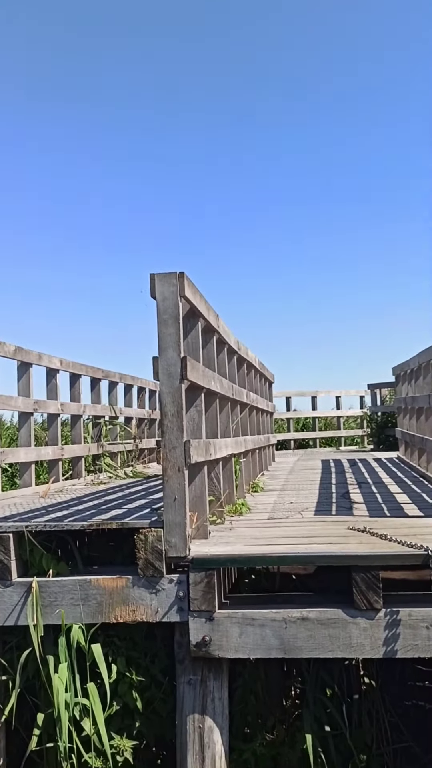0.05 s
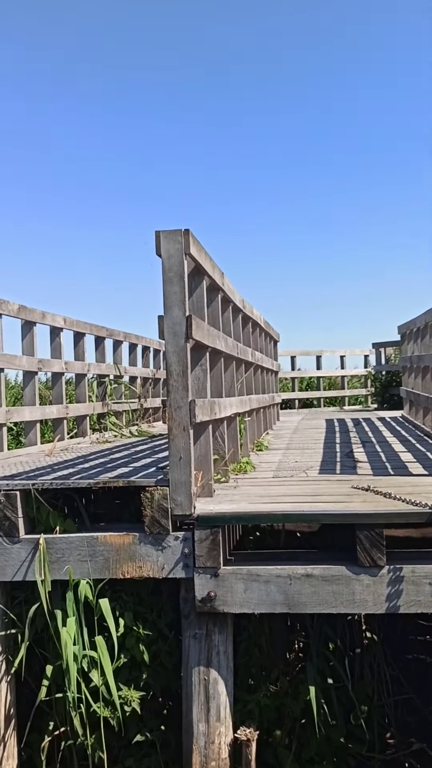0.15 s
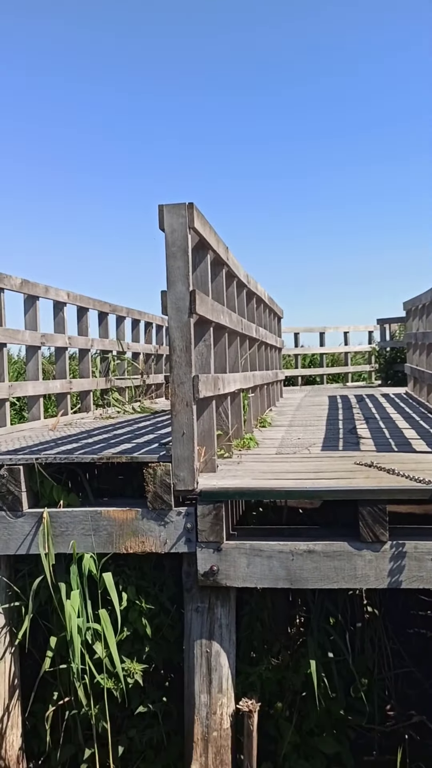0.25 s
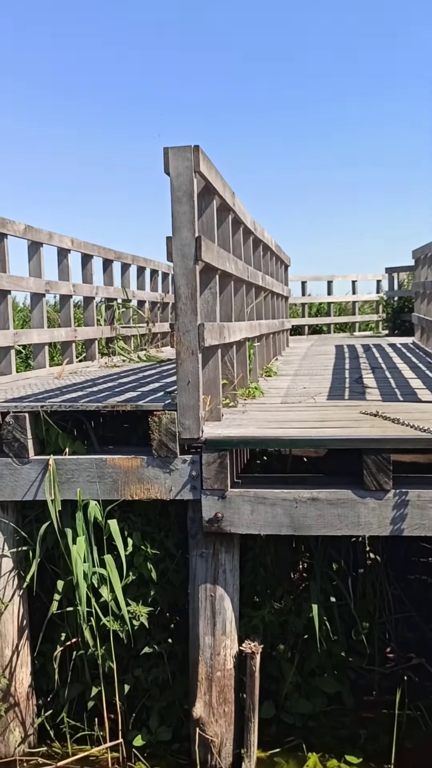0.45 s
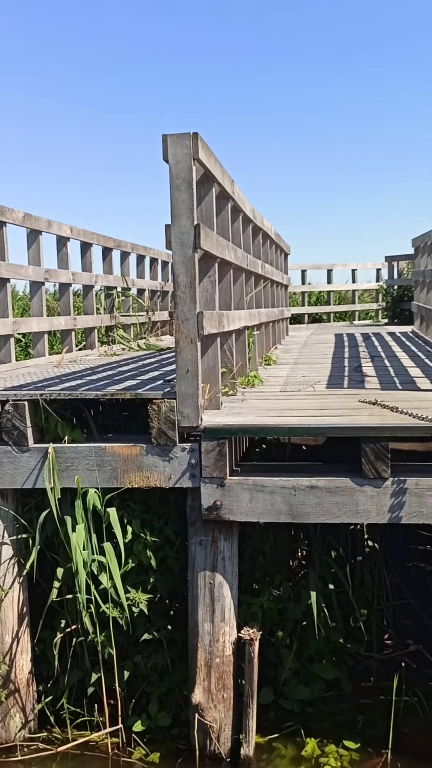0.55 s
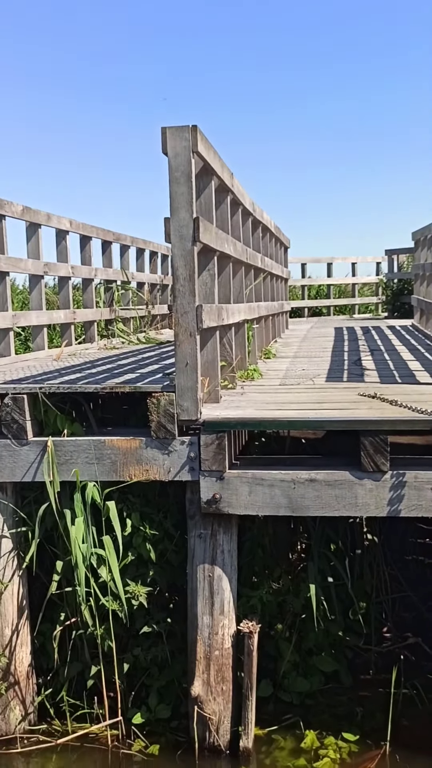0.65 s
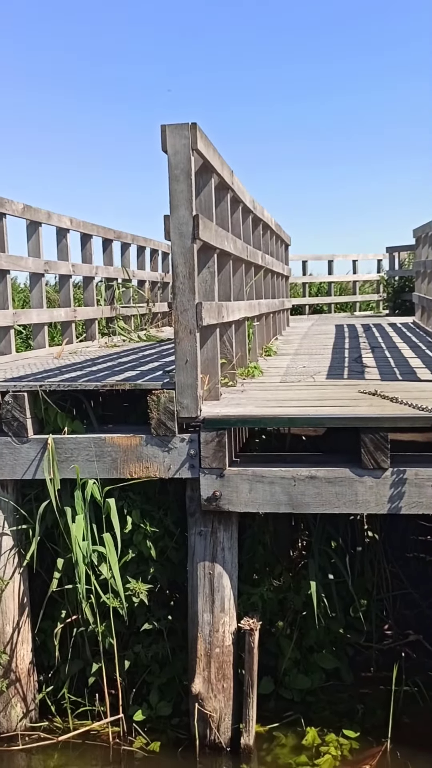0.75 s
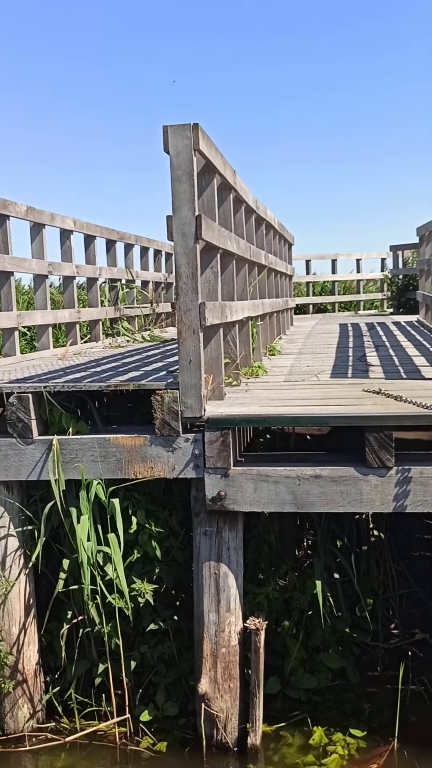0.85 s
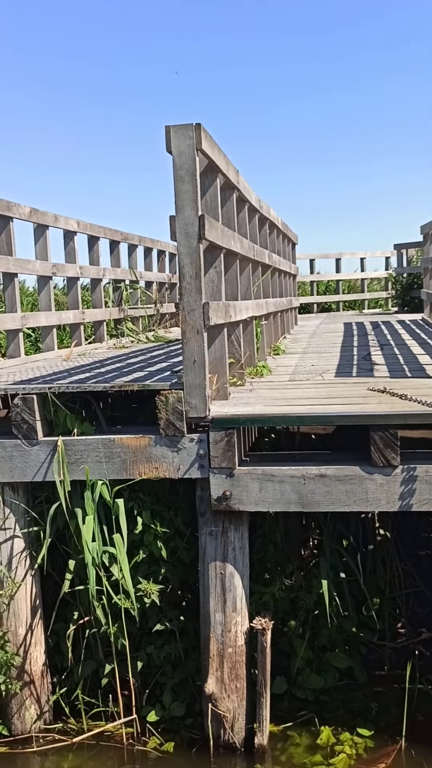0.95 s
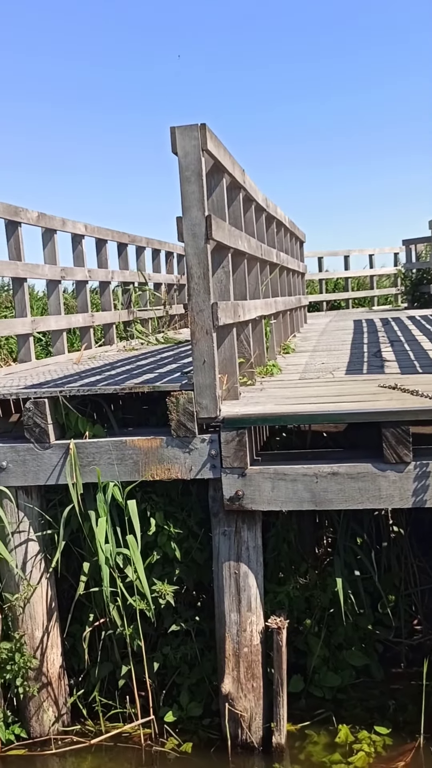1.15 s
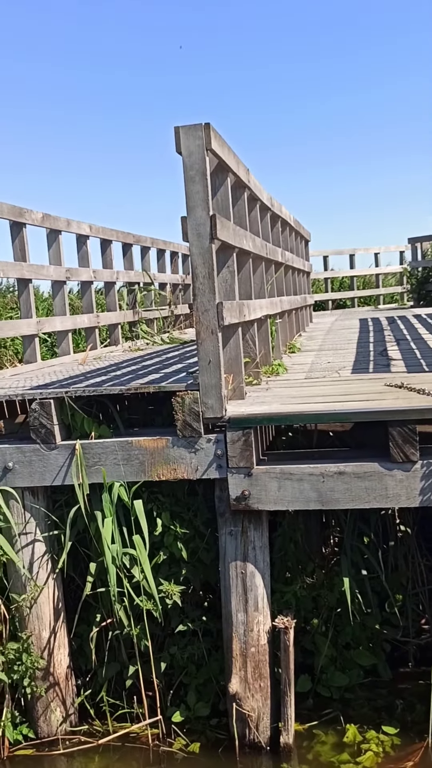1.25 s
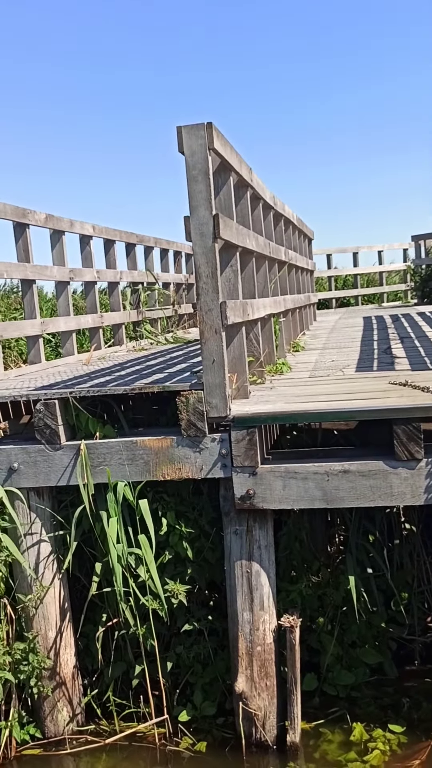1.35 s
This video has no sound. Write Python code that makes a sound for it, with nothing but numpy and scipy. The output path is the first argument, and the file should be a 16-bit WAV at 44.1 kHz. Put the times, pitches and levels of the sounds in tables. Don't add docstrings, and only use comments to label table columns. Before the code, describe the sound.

Chain links drop with a sharp metallic clank, followed by faint wooden knocks and small clicks

```python
import sys
import numpy as np
from scipy import signal
from scipy.fft import rfft, irfft, next_fast_len
from scipy.io import wavfile
from scipy.ndimage import uniform_filter1d, map_coordinates

SR = 44100
rng = np.random.default_rng(int(sys.argv[2]) if len(sys.argv) > 2 else 0)


def unload_audio(sound):
    columns = np.transpose(np.atleast_2d(sound))
    steps = np.round(np.clip(columns, -1, 1) * 32767)
    wavfile.write(sys.argv[1], SR, steps.astype(np.int16))


def attenuation_scalar(level_db):
    decades = np.asarray(level_db, float) / 20
    return 10 ** decades


N = 61739

# start in seconds, peak in dB, tilt in dB per octave.
CLANKS = [(.2122, -9, 9), (.2158, -15, -3), (.2288, -12, -0.5), (.2322, -6, 0.5), (.237, -19, -2),
          (.2425, -15.5, -2), (.2455, -16.5, 0), (.2495, -20, -4.5), (.2535, -30, -5.5),
          (.265, -24.5, -6.5), (.272, -34, -7)]
# pitch in Hz, level in dB.
CLANK_COLOUR = [(450, -21), (900, -18.5), (1600, -10.5), (2600, -10.5), (4100, 1.5), (7500, 4.5),
                (15600, -3.5), (15850, -35)]
# pitch in Hz, level in dB, time to fall 60 dB in seconds.
SHACKLE = [(1172, -14, 0.3), (1370, -25, 0.21), (1445, -5, 0.13), (1687, 0.5, 0.13), (1949, -11, 0.18),
           (2450, -5, .15), (2937, -4.5, 0.11), (3391, -3.5, 0.22), (3681, -2.5, 0.28), (3800, -15, .2),
           (3992, -1.5, 0.16), (4070, 2.5, 0.099), (4570, -10, 0.091), (4680, -13, 0.2)]
# pitch in Hz, level in dB, time to fall 60 dB in seconds.
LINKS = [(5700, 1, 0.26), (6210, -2.5, 0.23), (6400, -3, 0.29), (6460, 4.5, 0.17), (6670, -15, 0.66),
         (6660, -0.5, 0.18), (7090, 3, 0.15), (7293, -8, 0.16), (7380, 3.5, 0.25), (7574, 4.5, 0.168),
         (7650, -4, 0.23), (8420, -8, 0.2), (8447, 5, 0.13), (12700, -15, 0.12)]


def clanks():
    return attenuation_scalar(-6) * contacts(CLANKS, CLANK_COLOUR, crack_s=0.0087, wet_db=4, tail=0.95,
                              modes=SHACKLE + LINKS, ring_db=-15)


# start in seconds, peak in dB, tilt in dB per octave.
TICKS = [(0.0298, -33.5, -14), (0.1104, -39, -8), (0.1224, -21, 8), (0.129, -28.5, 7), (0.4843, -33, -12.5),
         (0.5474, -60, 14), (0.6714, -33, -2), (0.6984, -59, 2), (0.7093, -40, 11), (0.7344, -56, 1),
         (0.8024, -48, -1), (0.935, -44, 0), (0.9811, -30, -5.5), (1.001, -33.5, 10), (1.0943, -26.5, 6),
         (1.1076, -29, 11), (1.1104, -36, 19), (1.1164, -41, 4), (1.119, -40, 13), (1.1232, -38, 10),
         (1.127, -40, 9), (1.1304, -42, 11), (1.1353, -26.5, 10), (1.139, -35, 8), (1.1434, -34, 9)]
# pitch in Hz, level in dB.
TICK_COLOUR = [(1000, -37), (3500, -6), (5000, 7.5), (16000, 2)]


def ticks():
    return attenuation_scalar(-7.5) * contacts(TICKS, TICK_COLOUR, crack_s=0.0032, wet_db=-5.5, tail=0.15,
                                modes=LINKS[-2:], ring_db=-42.5)


# start in seconds, peak in dB, tilt in dB per octave.
RAPS = [
    (.4425, -37.5, -2.5),
    (.4495, -34, 0),
    (.461, -39.5, -1.5),
]
# pitch in Hz, level in dB.
RAP_COLOUR = [(300, -19), (1000, -4), (1700, -4.5), (2300, -7), (3000, -3.5), (4000, 0), (4400, -4),
              (9000, -20)]
# pitch in Hz, level in dB, time to fall 60 dB in seconds.
PLANK = [(476.5, -4, 0.1), (648.3, 1, 0.14), (904, -4.5, 0.12), (1141, -2.5, 0.18), (1482, -1, 0.072),
         (1753, 5, 0.17), (2726, -3, 0.041), (4000, -5, 0.087)]


def raps():
    return attenuation_scalar(-5.5) * contacts(RAPS, RAP_COLOUR, crack_s=0.046, wet_db=-0.78, tail=0.9,
                                modes=PLANK[4:], ring_db=-10)


# start in seconds, peak in dB, tilt in dB per octave.
KNOCKS = [(.003, -41.5, -6.5), (.0305, -44.5, 2), (.165, -69, 9), (.345, -38.5, -2.5), (.677, -39.5, -3.5),
          (.739, -39, -6), (.99, -44, -5), (1.039, -41.5, -9.5), (1.078, -49, -8), (1.095, -36.5, -1),
          (1.103, -44, -8), (1.111, -43.5, -5.5), (1.119, -45, -4), (1.1265, -33.5, -2.5), (1.133, -37, -7),
          (1.141, -42.5, -7), (1.156, -41, -15), (1.35, -52, -6)]
# start in seconds, peak in dB, tilt in dB per octave.
HULL_BLOWS = [
    (0.2132, -23.5, 1.5),
    (0.23, -27.5, -4),
    (0.245, -31, 2),
]
# pitch in Hz, level in dB.
KNOCK_COLOUR = [(150, -20.5), (500, 6), (900, -5.5), (1600, 3.5), (2500, -2), (4000, -9.5), (5500, -5),
                (14000, -34)]


def knocks():
    return attenuation_scalar(-5.5) * contacts(KNOCKS + HULL_BLOWS, KNOCK_COLOUR, crack_s=0.018, wet_db=1.5, tail=0.43,
                                modes=PLANK, ring_db=-12.0)


# start in seconds, peak in dB, pitch in Hz, time to fall 60 dB in seconds.
CHINKS = [(.001, -44, 339, .1), (.012, -49, 535, .06), (.058, -53, 1790, 0.035), (.165, -51.5, 1590, 0.063),
          (.318, -44, 1157, 0.072), (.33, -46, 1620, .06), (.348, -43.5, 1473, 0.095),
          (.356, -42.5, 1606, 0.057), (.358, -55, 432, 0.065), (.4425, -40.5, 3946, 0.033),
          (.44, -41, 1720, 0.058), (.449, -38, 3945, 0.028), (.4515, -39, 3050, 0.011),
          (.457, -47, 3960, .025), (.462, -45, 1490, 0.031), (.47, -46, 580, 0.095),
          (.677, -45.5, 1470, 0.032), (.739, -44.5, 1460, 0.017), (.739, -44, 447, .025),
          (.743, -62, 3000, .02), (.75, -52, 486, 0.13), (.99, -50.5, 516, 0.15), (1.025, -56, 1435, 0.11),
          (1.095, -48.5, 727, 0.054), (1.096, -44, 1540, .03), (1.1265, -41, 1830, 0.023),
          (1.128, -51.5, 2670, 0.037), (1.136, -50, 1790, 0.043), (1.141, -44, 520, 0.08),
          (1.15, -48, 1610, 0.024), (1.156, -41.5, 555, 0.032), (1.16, -51, 1470, 0.031),
          (1.174, -58, 560, 0.041), (1.345, -50.5, 454, 0.042)]


def chinks():
    return pushes(CHINKS, rise_s=0.00085)


# start in seconds, end in seconds, level in dB.
FIZZ = [
    (.118, .136, -68),
    (1.104, 1.149, -68),
]


def fizz():
    t = np.arange(N) / SR
    gate = np.zeros(N)
    for start, end, db in FIZZ:
        edge_s = 0.004
        gate += attenuation_scalar(db) * np.clip(np.minimum(t - start, end - t) / edge_s, 0, 1)
    colour = [(5000, -25), (7500, -8), (12000, -8), (15500, 2), (16000, -27)]  # (Hz, dB)
    return gate * lumpy(colour, 400, lumps_db=6, patchy_db=1)


# start in seconds, peak in dB, pitch in Hz.
THUMPS = [(.004, -35.5, 155), (.017, -35.5, 134), (.033, -43, 262), (.045, -34.5, 177), (.05, -36.5, 85),
          (.064, -41.5, 245), (.088, -36, 104), (.113, -35, 111), (.148, -42.5, 130), (.168, -43, 110),
          (.203, -37.5, 102), (.248, -42, 143), (.275, -40, 116), (.31, -50, 110), (.35, -38, 113),
          (.405, -49.5, 100), (.428, -38.5, 84), (.468, -48.5, 110), (.505, -53, 90), (.54, -52, 70.4),
          (.567, -43, 126), (.612, -45, 141), (.65, -57, 121), (.726, -37.5, 93), (.76, -46, 100),
          (.862, -38, 112), (.91, -35, 98), (.933, -30.5, 181.5), (.962, -42, 90), (.995, -43.5, 130),
          (1.015, -48, 100), (1.035, -41.5, 116), (1.09, -48, 90), (1.125, -41, 117), (1.1415, -28, 101),
          (1.18, -37.5, 129), (1.195, -35, 98), (1.217, -34, 108), (1.228, -32, 122), (1.25, -36, 108),
          (1.265, -36, 85), (1.29, -42.5, 83), (1.343, -47, 105)]


def thumps():
    return pushes(THUMPS, rise_s=0.0016, t60=0.041)


# start in seconds, peak in dB, pitch in Hz.
SQUEAKS = [
    (.632, -42.5, 2840),
    (.647, -44.5, 2800),
]


def squeaks():
    return pushes(SQUEAKS, rise_s=0.0033, t60=0.019)


# time in seconds, level in dB.
STIR = [(0.0, -53.5), (.13, -56.5), (0.404, -49), (.6, -53.5), (0.786, -55.5), (.9, -58.5), (1.0, -57),
        (1.12, -57.5), (1.194, -63.5), (1.4, -64)]
# pitch in Hz, level in dB.
STIR_COLOUR = [(230, -0.5), (420, 3.5), (720, 0), (820, -4.5), (1250, -6.5), (1500, -3.5), (1980, -8.5),
               (2100, -22.5)]
# pitch in Hz, level in dB.
RUMBLE = [(40, -4), (80, -4.5), (150, -5), (300, -20), (600, -36.5)]
# pitch in Hz, level in dB.
HISS = [(300, 7.5), (1000, -26.5), (2400, 3), (3800, 7), (7400, 6), (13000, -31), (15600, -11), (15850, -4)]


def river():
    s, level_db = np.transpose(STIR)
    level_db = np.interp(np.arange(N) / SR, s, level_db)
    stir = attenuation_scalar(0.06 + level_db) * lumpy(STIR_COLOUR, 60.6, lumps_db=1.0, patchy_db=1.5)
    rumble = attenuation_scalar(-60) * lumpy(RUMBLE, 24.45, lumps_db=2, patchy_db=1.5)
    follow_db = 0.32 * (level_db - level_db.mean())
    hiss = attenuation_scalar(-62 + follow_db) * lumpy(HISS, 12.2, lumps_db=.3, patchy_db=.7)
    return stir + rumble + hiss


def contacts(events, colour, crack_s, wet_db, tail, modes, ring_db):
    out, t = np.zeros(N + SR), np.arange(SR // 3) / SR
    rise = 1 - np.exp(-t / (0.017 * crack_s))
    for s, db, tilt_db in events:
        def tilt(hz):
            return tilt_db * np.log2(np.clip(hz, 300, 16000) / 4000)

        def shaped(x):
            x = coloured(x, lambda hz: along(colour, hz) + tilt(hz))
            return x / np.linalg.norm(x) * np.sqrt(crack_s * SR / 14)

        crack = shaped(rise * attenuation_scalar(-60 * t / crack_s) * rng.standard_normal(len(t)))
        wet = shaped(rise * hull_tail(tail)[:len(t)])
        top_db = max(level + tilt(hz) for hz, level, _ in modes)
        ring = np.zeros(len(t))
        for hz, level, t60 in modes:
            luck_db = 3.13 * rng.standard_normal()
            drift = 0.02 * np.cumsum(rng.standard_normal(len(t)))
            mode_db = ring_db + level + tilt(hz) - top_db + luck_db
            ring += attenuation_scalar(mode_db - 60 * t / t60) * np.sin(2 * np.pi * hz * t + drift)
        out[round(s * SR):][:len(t)] += attenuation_scalar(db) * (crack + rise * ring + attenuation_scalar(wet_db) * wet)
    return out[:N]


# pitch in Hz, time to fall 60 dB in seconds.
HULL = [(300, 0.67), (1500, 0.72), (4000, 0.35), (7500, 0.22), (10000, 0.19), (14000, .17)]


def hull_tail(share):
    hz, t, z = signal.stft(rng.standard_normal(SR // 2), SR, nperseg=256)
    fade = attenuation_scalar(-60 * t / share / along(HULL, hz)[:, None])
    tail = signal.istft(z * fade, SR, nperseg=256)[1][:SR // 2]
    return tail / np.linalg.norm(tail)


def pushes(events, rise_s, t60=None):
    out, t = np.zeros(N + SR), np.arange(SR // 4) / SR
    rise = 1 - np.exp(-t / rise_s)
    for s, db, hz, *own in events:
        fade = attenuation_scalar(db + 3 - 60 * t / (t60 or own[0]))
        out[round(s * SR):][:len(t)] -= fade * rise * np.sin(2 * np.pi * hz * t)
    return out[:N]


def lumpy(colour, rate, lumps_db, patchy_db):
    points = rng.standard_normal(int(N * rate / SR) + 4)
    wobble = map_coordinates(points, [np.arange(N) * rate / SR])
    noise = coloured(patchy(patchy_db), lambda hz: along(colour, hz))
    return unit(attenuation_scalar(lumps_db * wobble) * noise)


def patchy(patchy_db):
    z = signal.stft(rng.standard_normal(N + 512), nperseg=512)[2]
    field = uniform_filter1d(rng.standard_normal(z.shape), size=5, axis=0)
    field = uniform_filter1d(field, size=5, axis=1)
    return signal.istft(z * attenuation_scalar(patchy_db * unit(field)), nperseg=512)[1][:N]


def unit(x):
    return x / np.sqrt(np.mean(x ** 2) + 1e-20)


def along(points, hz):
    f, v = np.transpose(points)
    return np.interp(np.log(hz + 1), np.log(f + 1), v)


def coloured(x, level_db):
    m = 2 * next_fast_len(len(x) // 2 + 4096)
    c = irfft(level_db(np.fft.rfftfreq(m, 1 / SR)) * np.log(10) / 20, m)
    c[1:m // 2] *= 2
    c[m // 2 + 1:] = 0
    return irfft(rfft(x, m) * np.exp(rfft(c)), m)[:len(x)]


def scene():
    chain = clanks() + ticks() + raps() + knocks() + chinks() + fizz()
    hull = thumps() + squeaks()
    return (chain + hull + river())[None]


def band_limit(x):
    return signal.sosfilt(signal.butter(12, 16470, fs=SR, output="sos"), x)


# pitch in Hz, gain in dB.
LOW_CUT = [(20, -29), (45, -18), (70, -1.5), (100, 0)]
# pitch in Hz, gain in dB.
NOTCH_LOW = [(4700, -1), (4900, -10.5), (5700, -12), (6200, -1.5)]
# pitch in Hz, gain in dB.
NOTCH_HIGH = [(8450, -0.5), (8700, -11), (10000, -19.5), (11450, -21), (11650, -4), (15650, -1),
              (15850, -28), (16400, -13)]


def record(dry):
    def response_db(hz):
        notches = along(NOTCH_LOW, hz) + along(NOTCH_HIGH, hz)
        return along(LOW_CUT, hz) + notches - 60 * (hz > 16480)

    mix = coloured(dry[0], response_db)[None]
    return band_limit(mix)


dry = scene()
out = record(dry)
unload_audio(out)
```